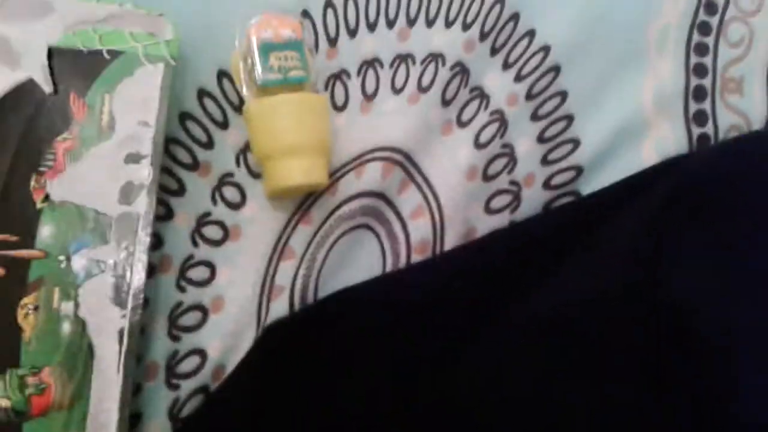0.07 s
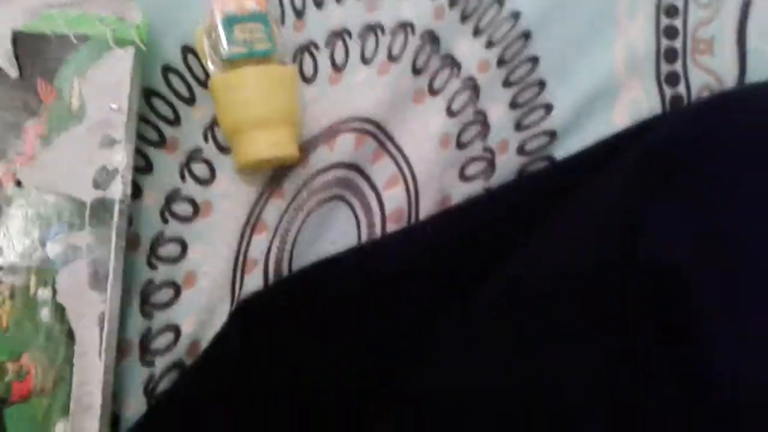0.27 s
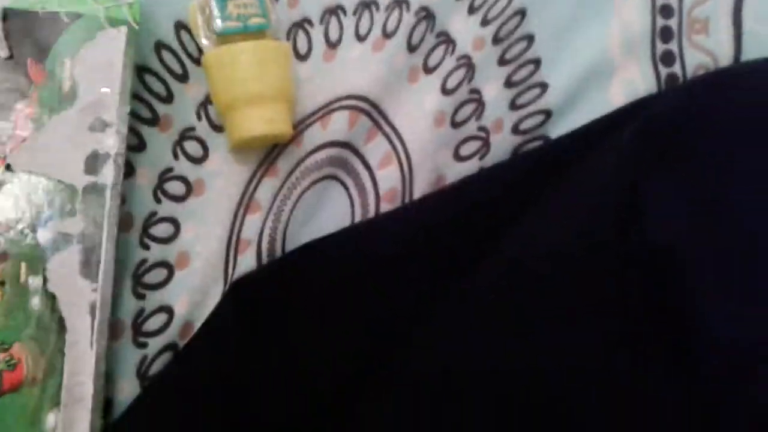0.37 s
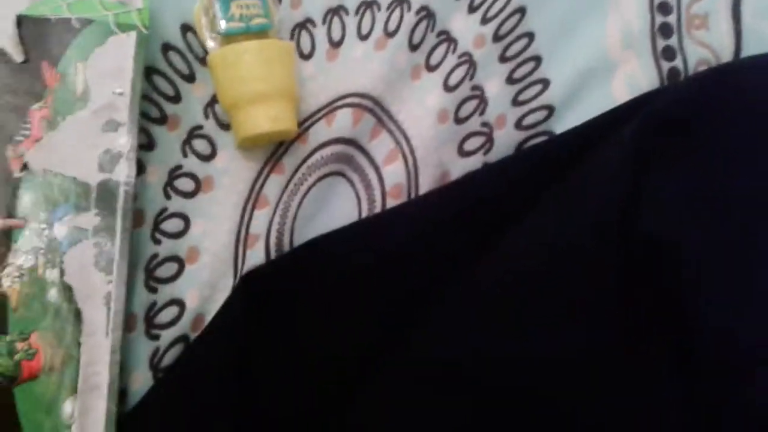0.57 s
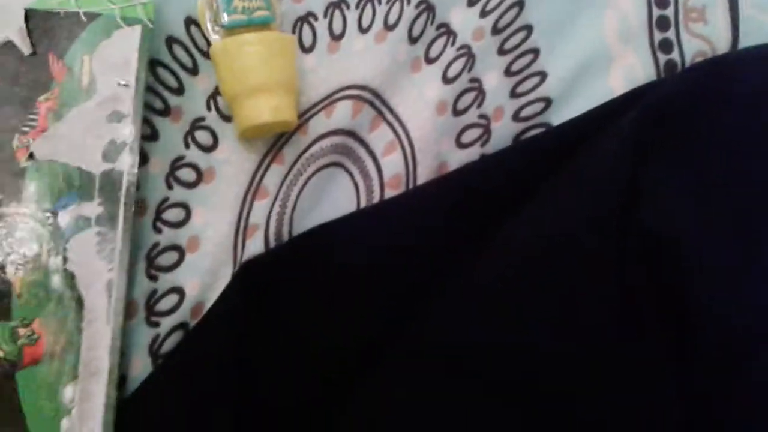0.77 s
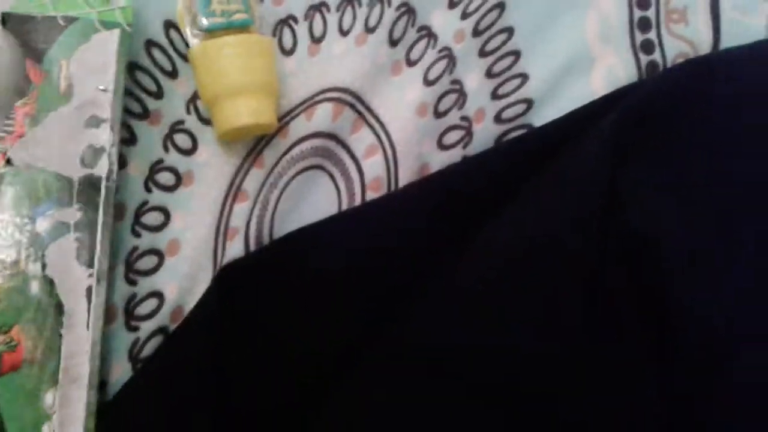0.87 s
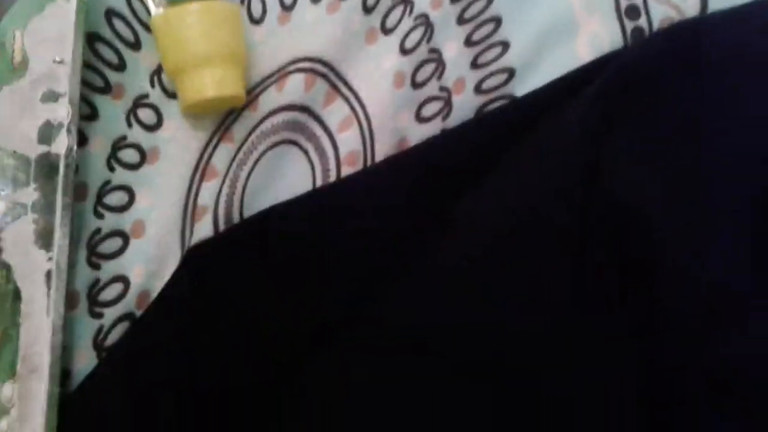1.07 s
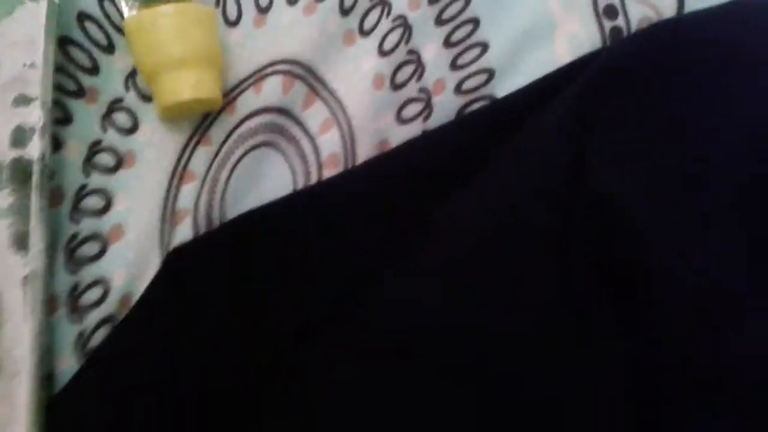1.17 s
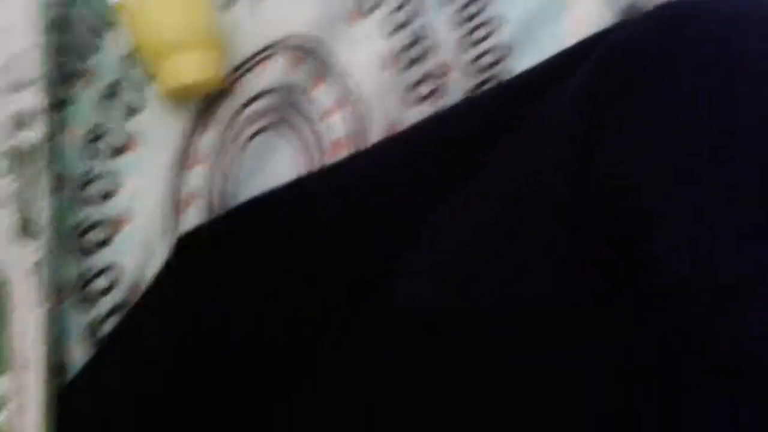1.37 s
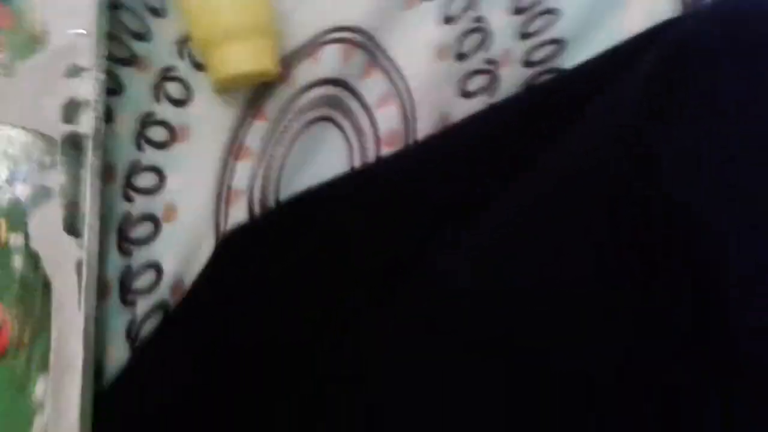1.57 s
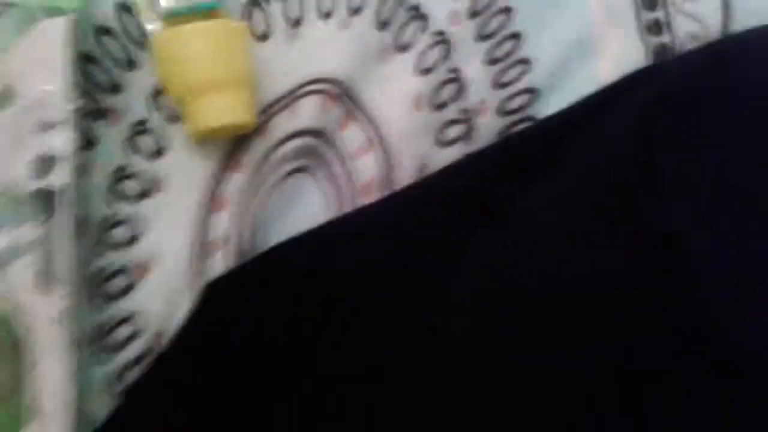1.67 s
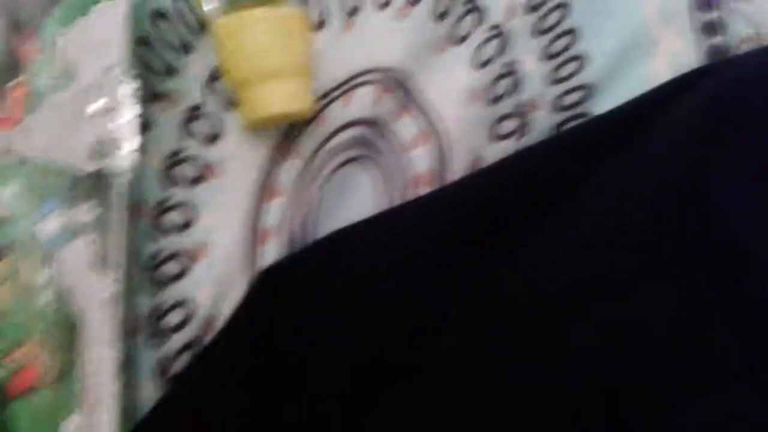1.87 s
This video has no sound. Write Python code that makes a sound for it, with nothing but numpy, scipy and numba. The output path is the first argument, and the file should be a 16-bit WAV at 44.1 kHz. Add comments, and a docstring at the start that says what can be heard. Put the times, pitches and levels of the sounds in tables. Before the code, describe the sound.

Small hard plastic toys and thin crinkly packaging spill onto a bedspread, with sharp clacks, soft hollow thumps and rattling for about a second, then near silence in a furnished bedroom, close to a phone microphone.

```python
"""Small hard plastic toys and a thin blister pack tumble out onto a bedspread, close to a phone's microphone.
Pieces clack together: short chatters of contacts that hold up a set of decaying plastic modes, with a crack.
Hollow parts thump on the bed as softly pushed pairs of rings; the moving heap rattles and crinkles as
thousands of tiny damped rings. A furnished bedroom answers briefly with dense fading echoes, and
shaped noise makes the quiet room tone and microphone hiss."""
import sys
import numpy as np
from scipy import signal
from scipy.fft import rfft, irfft
from scipy.io import wavfile
from numba import njit

SR = 44100
rng = np.random.default_rng(int(sys.argv[2]) if len(sys.argv) > 2 else 0)


def attenuation_scalar(level_db):
    """Turn a level in dB into a linear amplitude multiplier (20 dB per decade)."""
    decades = np.asarray(level_db, float) / 20
    return 10 ** decades


def wav_out(sig):
    """Save sig, one row per channel (or a flat mono array), as 16-bit PCM at SR to the path in sys.argv[1]."""
    wavfile.write(sys.argv[1], SR, np.round(np.clip(np.atleast_2d(sig).T, -1, 1) * 32767).astype(np.int16))


N = 83790  # samples, 1.9 s


def over_hz(table, hz):
    """Reads (frequency, value) points on a log-frequency axis."""
    rows = np.array(table, float)
    return np.interp(np.log(np.maximum(hz, 1)), np.log(rows[:, 0]), rows[:, 1])


def decay(t, t60):
    """Exponential fall by 60 dB in t60 seconds."""
    return np.exp(-np.log(1000) * t / t60)


def add(out, sound, start_s, peak_db):
    """Places a sound at start_s with the given peak."""
    i = max(int(start_s * SR), 0)
    n = min(len(sound), N - i)
    out[i:i + n] += sound[:n] * attenuation_scalar(peak_db) / np.max(np.abs(sound))


# spectrum of the quiet room and microphone, only its shape counts: (frequency [Hz], density [dB per Hz])
ROOM_TONE_SPECTRUM = [(15, -49), (25, -13), (70, -8.5), (103, -3), (232, -9.5), (259, -4), (339, -7),
                      (368, -3), (568, -13.5), (634, -8), (706, -14.5), (1010, -12.5), (1150, -15),
                      (1250, -17.5), (1980, -18), (4020, -20), (7510, -23.5), (15200, -19), (16500, -34.5)]
ROOM_TONE_RMS_DB = -65  # before the top cut


def room_tone():
    """Quiet house rumble and microphone hiss: steady noise shaped in frequency."""
    colour = attenuation_scalar(over_hz(ROOM_TONE_SPECTRUM, np.fft.rfftfreq(N, 1 / SR)))
    noise = irfft(rfft(rng.standard_normal(N)) * colour, N)
    return noise * attenuation_scalar(ROOM_TONE_RMS_DB) / np.sqrt(np.mean(noise ** 2))


@njit
def grains(start, hz, size, cycles, n):
    """Each grain is one short damped ring, falling to 1/e in the given number of cycles."""
    out = np.zeros(n)
    for k in range(len(start)):
        turn = np.exp(2j * np.pi * hz[k] / SR - hz[k] / SR / cycles[k])
        state, first = size[k] + 0j, int(start[k])
        for j in range(first, min(n, first + int(6 * cycles[k] * SR / hz[k]))):
            out[j] += state.imag
            state *= turn
    return out


# how hard the heap moves: (time [s], rattle level [dB], tilt around 3 kHz [dB per octave])
HEAP_MOTION = [(0, -40, -0.6), (.03, -49, 0.8), (0.064, -50.5, 1.5), (0.098, -40, -1), (.145, -47, 1.6),
               (0.164, -51.5, -4), (0.199, -35.5, 6.3), (0.228, -30.5, -2.5), (.27, -54, 12),
               (0.298, -40.5, 1.4), (.33, -35.5, -3), (0.358, -26, 4.95), (0.383, -28, 2.3),
               (0.419, -34, 0.2), (0.498, -41.5, 0.1), (.55, -44.5, 0.7), (0.588, -38.5, 5.7),
               (0.628, -35.5, -2.3), (.7, -43.5, 4.2), (0.719, -38, 0.5), (.755, -56, 3), (0.779, -46, 1.3),
               (0.839, -39, 1.2), (.865, -33.5, 1.1), (.89, -24, 2.5), (.92, -47.5, -0.5), (1.0, -49, -1),
               (1.059, -58.5, -1.2), (1.1, -50.5, -2.1), (1.124, -63.5, -2.5), (1.25, -71, -4.7),
               (1.64, -84.5, 2), (1.73, -69, 0.3), (1.8, -89, 0.2)]
# spectrum of the ticks before the tilt, only its shape counts: (frequency [Hz], density [dB per Hz])
RATTLE_SPECTRUM = [(88, -42), (150, -14.5), (348, -3), (649, -7), (1360, -3), (2450, -6), (2760, -3.5),
                   (5570, -13), (6140, -17), (8730, -18.5), (16000, -32)]
TICKS_PER_S, TICK_CYCLES, TICK_SPREAD_DB = 9000, 6, 14


def rattle():
    """Countless tiny ticks and crinkles, louder and brighter or duller as the heap moves."""
    u = rng.random((int(TICKS_PER_S * N / SR), 4)).T
    time_s = u[0] * N / SR
    hz = 170 * (15500 / 170) ** u[1]
    cycles = TICK_CYCLES * (.5 + u[2]) * (hz / 3000) ** 0.13
    # pitches are drawn evenly per octave and long rings carry more energy: even out both
    size = attenuation_scalar(over_hz(RATTLE_SPECTRUM, hz)) * hz / np.sqrt(cycles) * attenuation_scalar(TICK_SPREAD_DB * u[3])
    steady_rms = np.sqrt(np.mean(grains(time_s * SR, hz, size, cycles, N) ** 2))
    motion_s, level_db, tilt_db = np.array(HEAP_MOTION, float).T
    motion_db = np.interp(time_s, motion_s, level_db, right=-120)
    motion_db = motion_db + np.interp(time_s, motion_s, tilt_db) * np.log2(hz / 3000)
    return grains(time_s * SR, hz, size * attenuation_scalar(motion_db) / steady_rms, cycles, N)


# hollow parts landing on the bed, levels before echo and microphone:
# (time [s], peak level [dB], pitch [Hz], ring t60 [s])
BED_LANDINGS = [(0.012, -41, 380, 0.078), (0.091, -43.0, 304, 0.04), (0.1239, -34.5, 383, 0.032),
                (0.1726, -34, 365, 0.04), (0.2, -28.5, 460, 0.026), (0.24, -47, 130, 0.08),
                (0.3048, -32.5, 287, 0.067), (0.3419, -24.5, 426, 0.05), (0.3731, -26, 384, 0.04),
                (0.381, -24.5, 533.0, 0.043), (0.4122, -23.5, 330, 0.024), (0.414, -38, 123, 0.08),
                (0.4354, -24.5, 332, 0.037), (0.45, -36, 333, 0.027), (0.48, -42.5, 110, 0.08),
                (0.4955, -41.8, 480, 0.04), (0.6004, -31, 323, 0.076), (0.6165, -38, 312.0, 0.058),
                (0.655, -42.5, 148, 0.14), (0.656, -40, 515, 0.047), (0.7193, -46, 372, 0.025),
                (0.718, -45, 109, 0.14), (0.8204, -33.5, 544, 0.058), (0.8632, -24, 355, 0.062),
                (0.873, -25.5, 441, 0.042), (0.895, -35.5, 195, 0.12), (0.9053, -35, 347, 0.065),
                (1.0013, -51, 409.0, 0.03)]
PUSH_CYCLES = 0.3  # length of the soft push, in cycles of the pitch
UPPER_MODE_DB = -4


def thumps():
    """A soft push rings a hollow part and its next mode, which dies sooner."""
    out = np.zeros(N)
    t = np.arange(8192) / SR
    for time_s, peak_db, hz, t60 in BED_LANDINGS:
        lower = np.sin(2 * np.pi * hz * t) * decay(t, t60)
        upper = np.sin(2 * np.pi * 1.4 * hz * t) * decay(t, max(0.32 * t60, .002))
        push = np.hanning(int(PUSH_CYCLES * SR / hz) + 3)
        add(out, np.convolve(lower + attenuation_scalar(UPPER_MODE_DB) * upper, push), time_s, peak_db)
    return out


# plastic against plastic, levels before echo and microphone:
# (time [s], peak level [dB], own ring [Hz], brightness above the own ring [dB per octave], chatter length [ms])
PLASTIC_CONTACTS = [(0.0151, -37, 870, 15, 3), (0.088, -16.5, 1914, -2.5, 2.2),
                    (0.1248, -25, 1115, -7.5, 1.5), (0.1567, -36, 860, -5.0, 1.2),
                    (0.1705, -40, 900.0, -14.5, 0.85), (0.1785, -23, 9130, -9.0, 0.92),
                    (0.186, -13.5, 1993, -4, 0.22), (0.1984, -15, 2210, -6.5, 0.23),
                    (0.2039, -23.5, 1220, -6, 0.3), (0.2204, -27, 3900, -11, 2.5),
                    (0.2292, -19, 1230, -6.5, 0.76), (0.2398, -4, 2750.0, -3, 0.78),
                    (0.247, -21.5, 3080, -6, 0.98), (0.2934, -26.1, 3230, -7.5, 2.3),
                    (0.3054, -18.4, 1319, -6.5, 0.4), (0.3272, -26, 2730, -4, 2),
                    (0.3377, -15, 3280, -5.5, 4.16), (0.3434, 3.5, 3126, -1.5, 2.8),
                    (0.3747, -8.5, 1410.0, -7, 0.55), (0.3807, -14.5, 2713.0, -5.5, 2.7),
                    (0.3843, -15, 2668, -7.5, 0.3), (0.4118, -21.5, 1080, -14, 2.5),
                    (0.4287, -23.5, 2870, -6.5, 0.3), (0.4534, -22.5, 1540, -5.0, 1.9),
                    (0.4606, -31, 2896.0, -0.5, 0.44), (0.499, -29, 2420, -7.5, 0.9),
                    (0.5278, -28.5, 824.0, -8.5, 0.37), (0.5582, -27, 980, -7, 0.63),
                    (0.6013, 0.5, 3800.0, -3.5, 2.2), (0.613, -22.5, 3660, -5.0, 1.9),
                    (0.632, -30, 2480, -7, 0.3), (0.6399, -29, 810, -11.5, 3.8),
                    (0.6653, -31, 1840, -6, 1.3), (0.7145, -24, 2550, -6.5, 0.87),
                    (0.7759, -33, 2220, 0, 0.28), (0.8165, -20.5, 1190, -2.0, 3.2),
                    (0.8481, -18.5, 3080, -3.5, 2.3), (0.8641, -7.5, 3320, -14, 0.86),
                    (0.871, -18.5, 2790, -5, 1.1), (0.874, -5, 2634, -1, 0.4),
                    (0.8762, -10.5, 2980, -1, 1.3), (0.8822, -13.5, 1280, -8.5, 0.9),
                    (0.8864, -34, 3250, -14, 5.3), (0.895, -15.5, 2600, 1, 3.8),
                    (0.901, -19.8, 2680, -3.5, 3.4), (0.9222, -27, 1320, -5.0, 3.5),
                    (0.9999, -32.5, 1080, -17, 1.6), (1.0304, -57, 3300.0, 3, 3.9),
                    (1.0753, -36, 1276.0, -7, 1.66), (1.092, -37, 2730, 15, 7.4),
                    (1.245, -44.5, 2870, 2, 0.65)]
# what a moulded toy rings with, before strike-to-strike spread: (frequency [Hz], level [dB], t60 [s])
MOULDED_MODES = [(900, -10, 0.02), (1403, -12, .016), (1800, -10, .01), (2178, -3.5, .012),
                 (2750, -1, .012), (3353, -5, 0.0087), (3800, -8, 0.0033), (4280, -7, .01),
                 (4804, -11.5, .008), (5020, -11.5, .008), (5800, -14.5, .006), (6847, -15.5, .005),
                 (8000, -12.5, .004), (9720, -11, 0.00399)]
OWN_RING_DB, OWN_T60_S = -1.5, 0.013  # level is against the loudest mode
BELOW_DB_PER_OCT = 3  # loss below the own ring
SIZE_SPREAD, STRIKE_SPREAD_DB = 0.014, 3.5  # standard deviations; size as a share of pitch
CHATTER_LEAD_MS, CHATTER_RISE_MS = .7, 0.67
CRACK_DB, CRACK_HZ = 5, 9004
CRACK_FALL_MS, CRACK_SHARE = 0.54, 0.5  # share of the chatter length added to the fall


def clacks():
    """A chatter of contacts holds the toy's modes up for a moment, strongest near the struck piece's own ring;
    the contacts themselves crack."""
    out = np.zeros(N)
    t = np.arange(1500) / SR
    mode_hz, mode_db, mode_t60 = np.array(MOULDED_MODES, float).T
    t60 = np.append(mode_t60, OWN_T60_S)
    rise = np.clip(t * 1000 / CHATTER_RISE_MS, 0, 1)
    for time_s, peak_db, own_hz, tilt_db, chatter_ms in PLASTIC_CONTACTS:
        def colour(f):
            slope = np.where(f > own_hz, tilt_db, BELOW_DB_PER_OCT)
            return attenuation_scalar(slope * np.log2(f / own_hz))

        struck_hz = mode_hz * (1 + SIZE_SPREAD * rng.standard_normal(len(mode_hz)))
        strike_db = STRIKE_SPREAD_DB * rng.standard_normal(len(mode_hz))
        gain = attenuation_scalar(mode_db + strike_db) * colour(struck_hz)
        own_gain = attenuation_scalar(OWN_RING_DB) * gain.max()
        # the own ring takes the place of the nearest mode
        gain[np.argmin(np.abs(np.log(mode_hz / own_hz)))] = 0
        hz, gain = np.append(struck_hz, own_hz), np.append(gain, own_gain)

        phase = rng.standard_normal((len(hz), 1))  # in cycles
        waves = np.sin(2 * np.pi * (hz[:, None] * t + phase))
        after_chatter = np.maximum(t - (chatter_ms + CHATTER_RISE_MS) / 1000, 0)
        body = np.sum(gain[:, None] * waves * decay(after_chatter, t60[:, None]), axis=0)

        noise = rng.standard_normal(len(t) + 2)
        crack = noise[2:] - noise[:-2]  # thins out the bass and the extreme treble
        crack = crack * np.exp(-t * 1000 / (CRACK_FALL_MS + CRACK_SHARE * chatter_ms))
        crack = crack * attenuation_scalar(CRACK_DB) * colour(CRACK_HZ)
        add(out, rise * (body + crack), time_s - CHATTER_LEAD_MS / 1000, peak_db)
    return out


# how long the furnished bedroom rings: (frequency [Hz], t60 [s])
BEDROOM_T60 = [(150, 0.34), (500, 0.39), (1500, 0.18), (4000, 0.24), (9000, 0.3), (15000, 0.54)]
ECHO_DB, ECHO_GAP_S, ECHO_BUILD_S = -11.5, 0.0027, .008  # level is the energy of the whole echo tail
BEDDING_DB_PER_OCT = -1  # above 3 kHz, soaked up by bedding


def bedroom(x):
    """Dense echoes that build up after a short gap and fade band by band."""
    t = np.arange(SR // 2) / SR
    f = np.fft.rfftfreq(len(t), 1 / SR)
    tail = np.zeros(len(t))
    for hz in 100 * 2 ** np.arange(0, 7.6, .5):
        octaves_off = np.abs(np.log2(np.maximum(f, 1) / hz))
        share = np.clip(1 - octaves_off / .5, 0, 1) ** .5
        band = irfft(rfft(rng.standard_normal(len(t))) * share, len(t))
        soaked = attenuation_scalar(BEDDING_DB_PER_OCT * max(np.log2(hz / 3000), 0))
        tail += soaked * band * decay(t, over_hz(BEDROOM_T60, hz))
    tail *= np.clip((t - ECHO_GAP_S) / ECHO_BUILD_S, 0, 1)
    tail *= attenuation_scalar(ECHO_DB) / np.sqrt(np.sum(tail ** 2))
    return signal.fftconvolve(x, tail)[:N]


def scene():
    """The tumbling toys, heard directly and through the bedroom's echo."""
    toys = rattle() + thumps() + clacks()
    return (toys + bedroom(toys))[None]


MIC_DULL_HZ, MIC_DULL_DB = 11080, -12.5
MIC_CEILING = .74  # amplitude the rounded peaks approach
MIC_LOW_HZ, MIC_TOP_HZ = 168.4, 15750


def phone_microphone(dry):
    """A close phone dulls the very top, rounds loud peaks, cuts bass, adds its noise floor and cuts the top."""
    low = signal.sosfiltfilt(signal.butter(6, MIC_DULL_HZ, fs=SR, output="sos"), dry)
    x = low + attenuation_scalar(MIC_DULL_DB) * (dry - low)
    x = x / (1 + np.abs(x / MIC_CEILING) ** 4) ** .25
    x = signal.sosfilt(signal.butter(2, MIC_LOW_HZ, "high", fs=SR, output="sos"), x)
    x = x + room_tone()
    return signal.sosfilt(signal.ellip(8, .2, 60, MIC_TOP_HZ, fs=SR, output="sos"), x)


def roll_off(x):
    """The treble ends steeply here."""
    return signal.sosfilt(signal.butter(12, 16990, fs=SR, output="sos"), x)


def record(dry):
    """The scene as the phone takes it down."""
    mix = phone_microphone(dry)
    return roll_off(mix)


dry = scene()
out = record(dry)
wav_out(out)
```